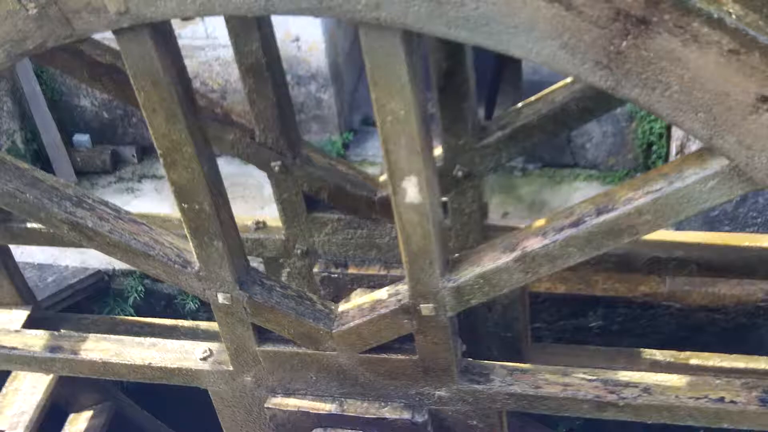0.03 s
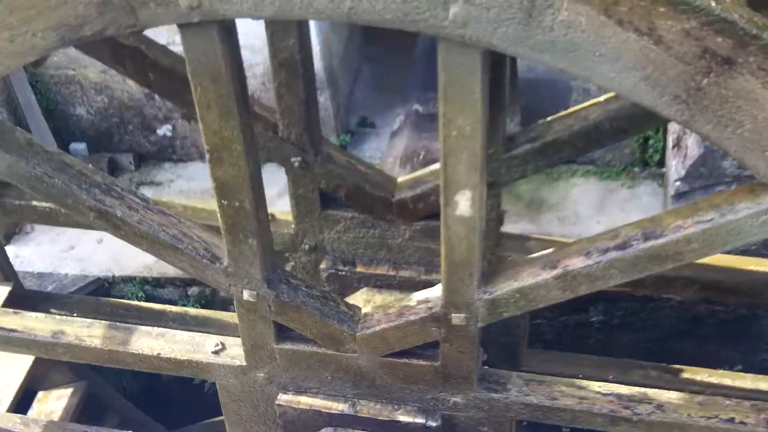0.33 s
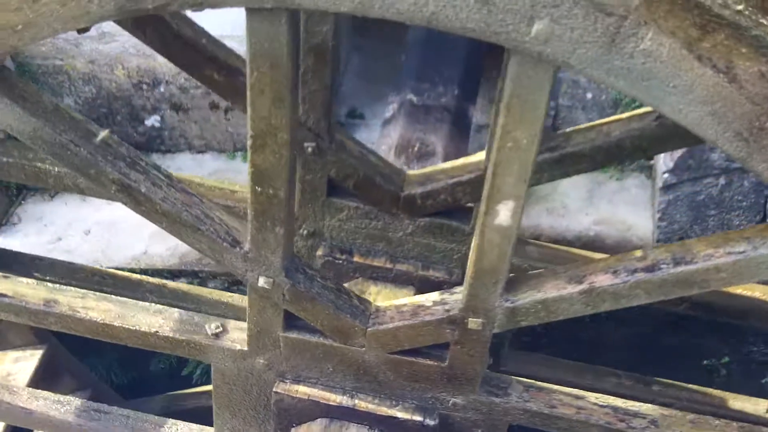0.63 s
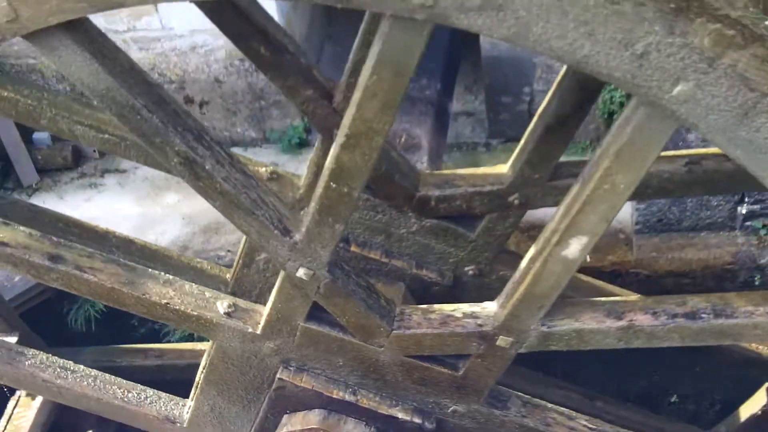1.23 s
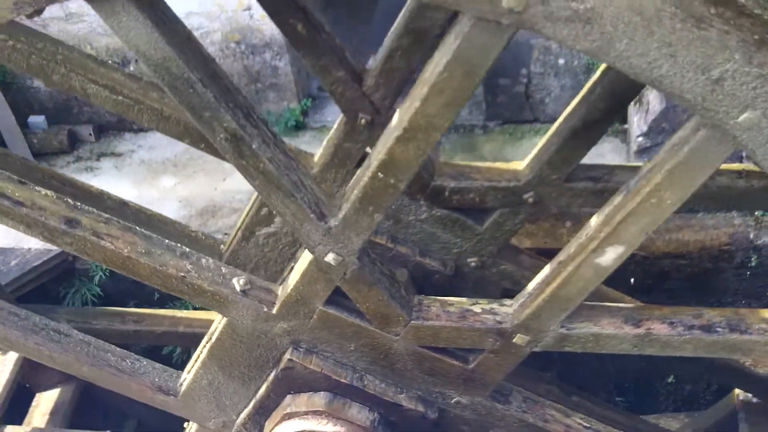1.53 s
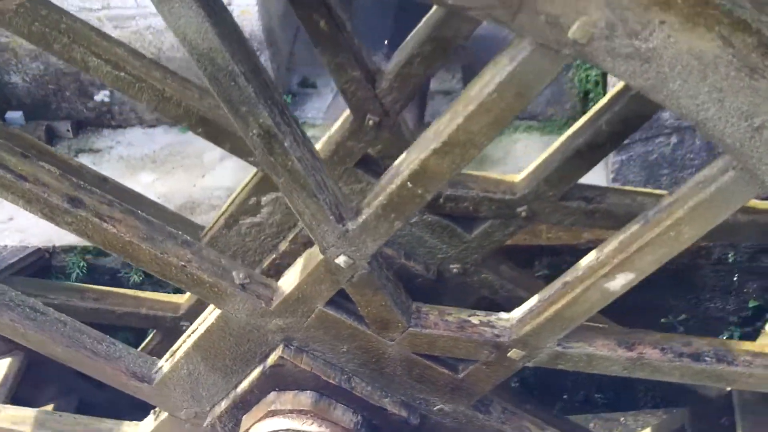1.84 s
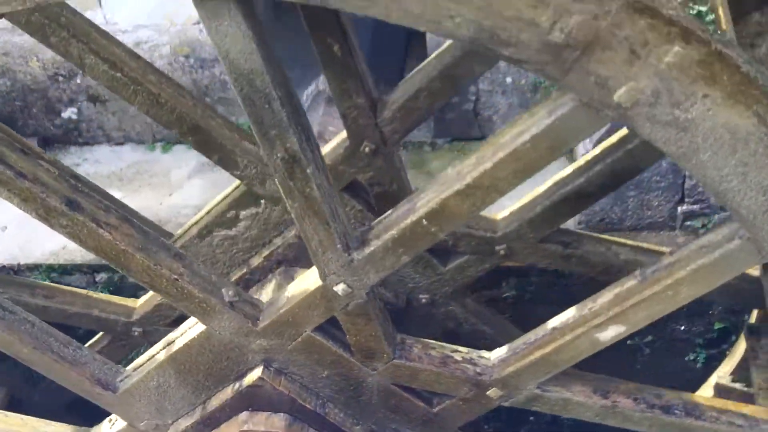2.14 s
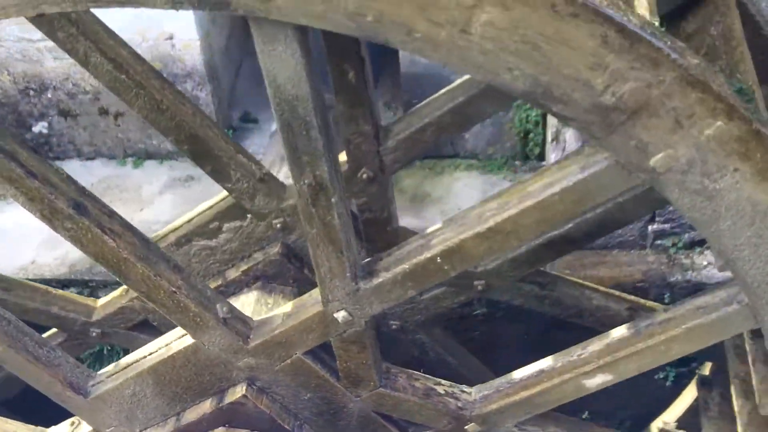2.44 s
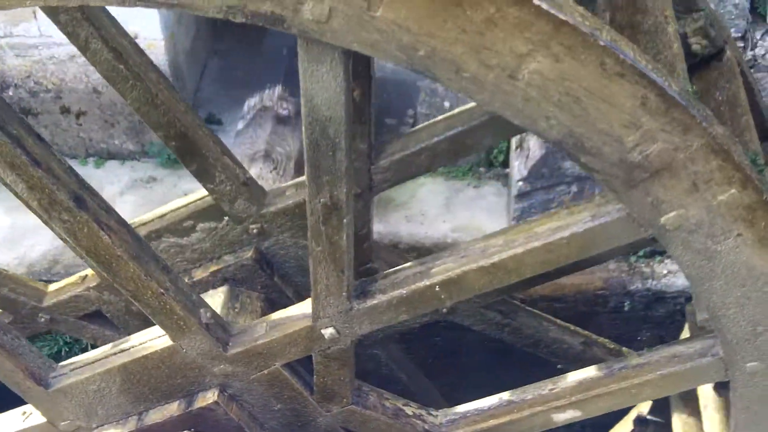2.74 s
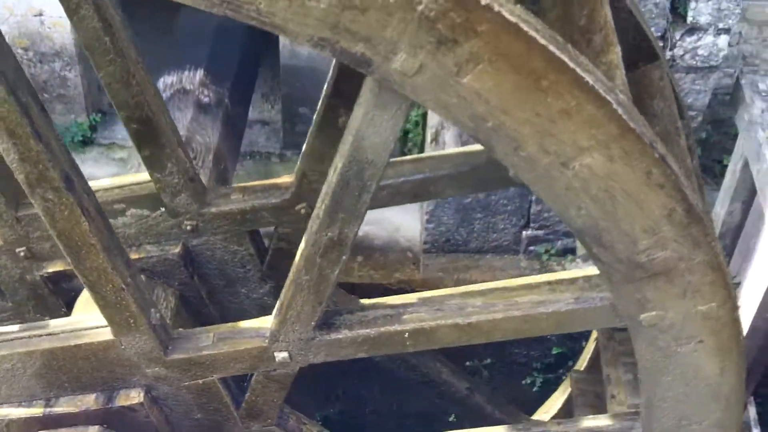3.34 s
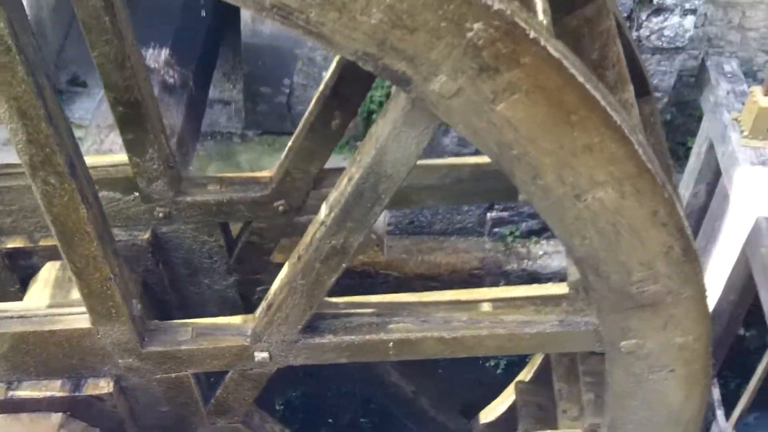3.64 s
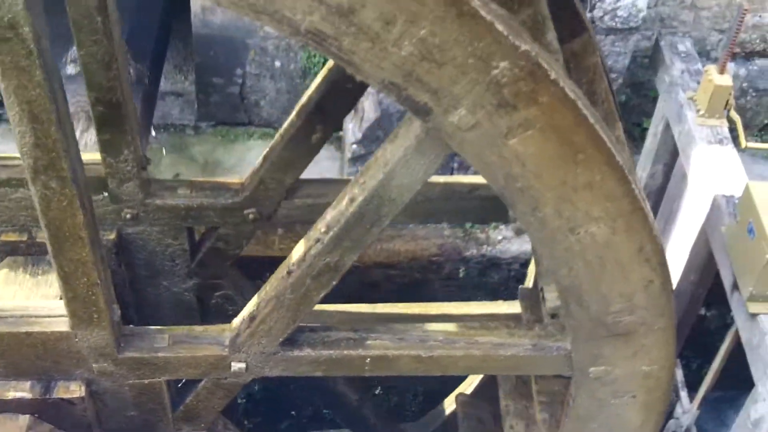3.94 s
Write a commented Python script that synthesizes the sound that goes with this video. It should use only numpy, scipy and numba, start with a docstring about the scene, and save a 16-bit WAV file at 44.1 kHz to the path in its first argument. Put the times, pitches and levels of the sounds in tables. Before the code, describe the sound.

A steady, churning rush of water pours and splashes over a turning wooden water wheel.

```python
"""A steady rush of water cuts in after a moment of silence, pouring over a large wooden wheel
beside a stone wall, a few metres away. The rush is churned foam, thousands of small ringing bubbles
and fine spray. It surges about four times a second as water slaps down, with bright splashes and
darker sloshes. Runoff from the paddles builds near the end; air pockets gulp and the pit thuds below."""
import sys
import numpy as np
from scipy import signal
from scipy.fft import rfft, irfft
from scipy.io import wavfile
from scipy.ndimage import uniform_filter1d
from numba import njit

SR = 44100
rng = np.random.default_rng(int(sys.argv[2]) if len(sys.argv) > 2 else 0)


def to_wav(sig):
    """Store sig (one row per channel, or 1-D mono) as 16-bit WAV at the path in sys.argv[1].

    Samples outside -1..1 are clipped; the rate is SR.
    """
    pcm = np.clip(np.atleast_2d(sig), -1, 1) * 32767
    pcm = np.round(pcm).astype(np.int16)
    wavfile.write(sys.argv[1], SR, pcm.T)  # frames by channels


N = 176400
BUBBLE_GLIDE = 0.069  # fractional pitch rise per decay time


def undb(db):
    """Decibels to gain."""
    return 10 ** (np.asarray(db) / 20)


def level(x, db):
    """Set the rms level."""
    return x * undb(db) / np.sqrt(np.mean(x ** 2))


def colour(x, points):
    """Filter by (f/Hz, gain/dB) points joined on a log-frequency axis."""
    hz, db = np.array(points).T
    bins_hz = np.maximum(np.fft.rfftfreq(N, 1 / SR), 1)
    return irfft(rfft(x) * undb(np.interp(np.log(bins_hz), np.log(hz), db)), N)


def resonate(x, hz, width_hz):
    """Band-pass resonance, applied twice."""
    b, a = signal.iirpeak(hz, hz / width_hz, fs=SR)
    return signal.lfilter(b, a, signal.lfilter(b, a, x))


def noise_band(hz, width_hz, db=0):
    """Band-passed noise at a set rms level."""
    return level(resonate(rng.standard_normal(N), hz, width_hz), db)


def wander(rate_hz):
    """Smooth random drift, rms 1."""
    hold = int(SR / rate_hz)
    steps = rng.standard_normal(1024)[np.arange(N) // hold % 1024]
    return level(uniform_filter1d(uniform_filter1d(steps, hold), hold), 0)


def swell(t, at_s, rise_s, fall_s):
    """Gaussian hump, height 1."""
    return np.exp(-.5 * ((t - at_s) / np.where(t < at_s, rise_s, fall_s)) ** 2)


@njit
def ring(start_samples, hz, q, gain, glide):
    """Each bubble rings as a decaying sine of rising pitch."""
    out = np.zeros(N)
    for k in range(len(start_samples)):
        decay_samples = q[k] * SR / hz[k] / np.pi
        step_rad = 2 * np.pi * hz[k] / SR
        phasor = gain[k] + 0j
        turn = np.exp(1j * step_rad - 1 / decay_samples)
        bend = np.exp(1j * step_rad * glide / decay_samples)
        first = int(start_samples[k])
        for i in range(first, min(N, first + int(5 * decay_samples))):
            out[i] += phasor.imag
            phasor *= turn
            turn *= bend
    return out


# Falling-water spectrum: f/Hz, gain/dB
WATER_SPECTRUM = [(12, -45), (22, -12), (33, -4), (48, -15), (68, -16), (115, -8), (200, -4.5), (310, -3.7),
                  (390, -4.5), (470, -3), (560, -0.9), (1000, -1.2), (1500, -1.4), (2300, -1.5), (2850, -3),
                  (3200, -4.5), (4000, -8.5), (5000, -11.5), (6100, -16), (7000, -23.5)]
def foam(flicker_db=0.65, flicker_hz=22, churn_db=0.34, churn_hz=35):
    """Churned white water: octave bands flicker alone and churn together."""
    octave = np.log2(np.maximum(np.fft.rfftfreq(N, 1 / SR), 1) / 20)
    spectrum = rfft(rng.standard_normal(N))
    wash = np.zeros(N)
    for k in range(10):
        band = irfft(spectrum * np.maximum(1 - abs(octave - k), 0), N)
        wash += band * undb(flicker_db * wander(flicker_hz))
    wash *= undb(churn_db * wander(churn_hz))
    return level(colour(wash, WATER_SPECTRUM), db=-26.5)


def bubbles(per_s=5000, low_hz=430, high_hz=5500, min_q=5.95, spread_db=4):
    """A dense crowd of small bubbles, each ringing for a few milliseconds."""
    when, pitch, length, size = rng.random((int(per_s * N / SR), 4)).T
    hz = (np.sqrt(low_hz) + pitch * (np.sqrt(high_hz) - np.sqrt(low_hz))) ** 2
    gain = undb(spread_db * np.minimum(-np.log(size), 4)) * hz ** 0.74
    crowd = ring(when * N, hz, min_q * 4 ** length, gain, BUBBLE_GLIDE)
    return level(colour(crowd, WATER_SPECTRUM), db=-31)


def spray(per_s=4500, spread_db=3.5):
    """Drops smack on wet planks and on the pool."""
    when, size, polarity = rng.random((int(per_s * N / SR), 3)).T
    gain = np.sign(polarity - .5) * undb(spread_db * np.minimum(-np.log(size), 4))
    ticks = np.bincount((when * N).astype(int), gain, N)
    patter = resonate(ticks, hz=1900, width_hz=5500)
    return level(colour(patter, WATER_SPECTRUM), db=-33)


# Slaps of water: t/s, body lift/dB, treble lift/dB
SURGE_LIFTS = [(.14, 1, 3), (.36, 1.7, 2.4), (.49, 1, 1), (.62, 1.5, 3), (.84, 1, 2), (1.17, 0.3, 2),
               (1.36, 0.8, 1.5), (1.66, -0.5, 1.7), (1.83, 0.5, 2), (1.97, .5, 1), (2.11, 0.2, 1),
               (2.30, 0.1, 1.5), (2.58, 0.4, 2.6), (2.97, 0.8, 0.7), (3.10, .7, 1), (3.27, .6, 2),
               (3.48, 0, 2.5), (3.66, 0.2, 2.6), (3.81, 0.4, 1.9), (3.96, 0.5, 2.5)]
def surges(t, rush, rise_s=0.049, fall_s=0.035, split_hz=3000, ramp_db_per_s=0.24):
    """Each slap of water lifts body and treble separately; the whole rush slowly grows."""
    lifts_db = sum(np.outer([body_db, treble_db], swell(t, at_s, rise_s, fall_s))
                   for at_s, body_db, treble_db in SURGE_LIFTS)
    lifts_db -= lifts_db.mean(axis=1, keepdims=True)
    body_gain, treble_gain = undb(lifts_db + ramp_db_per_s * (t - t.mean()))
    body = signal.sosfiltfilt(signal.butter(3, split_hz, fs=SR, output="sos"), rush)
    return body_gain * body + treble_gain * (rush - body)


# Bright splashes: t/s, f/Hz, level/dB
SPLASH_CLUSTERS = [(.61, 2460, -31), (1.66, 2730, -35), (1.84, 2330, -34), (2.0, 2000, -34),
                   (2.32, 2150, -36), (2.57, 2370, -31), (2.81, 2340, -31), (3.09, 1920, -30.5),
                   (3.2, 2370, -32.5), (3.8, 2450, -33.5)]
def splashes(t, count=50, q=26, spread_oct=0.134, spread_s=.021):
    """Each splash traps a cluster of small bubbles that ring around one pitch."""
    out = np.zeros(N)
    for at_s, centre_hz, db in SPLASH_CLUSTERS:
        when, pitch = rng.standard_normal((count, 2)).T
        starts_s = np.maximum(at_s + spread_s * when, 0)
        hz = centre_hz * 2 ** (spread_oct * pitch)
        cluster = ring(starts_s * SR, hz, q * np.ones(count), np.ones(count), BUBBLE_GLIDE)
        duty = np.mean(swell(t, at_s, spread_s, spread_s))
        out += level(cluster, db) * np.sqrt(duty)  # rms over the splash itself
    return out


# Plunging slugs: t/s, f/Hz, level/dB
SLOSH_PLUNGES = [(.17, 530, -35), (.36, 387, -38), (.55, 780, -35.5), (.62, 603, -36), (.81, 600, -40),
                 (1.0, 420, -38), (1.22, 740, -36), (1.53, 700, -38), (2.05, 640, -33), (2.27, 647, -34),
                 (2.46, 563, -35), (2.74, 540, -31), (2.96, 704, -39), (3.09, 1100, -31),
                 (3.42, 700, -36.5), (3.84, 800, -32), (3.96, 420, -36.5)]
def sloshes(t, q=1.14, sigma_s=0.031):
    """Heavier slugs of water plunge with a darker splash, each at its own pitch."""
    return sum(noise_band(hz, hz / q, db) * swell(t, at_s, sigma_s, sigma_s)
               for at_s, hz, db in SLOSH_PLUNGES)


# Runoff envelope: t/s, level/dB
RUNOFF_ENVELOPE = [(0, -56), (2.3, -49), (3.2, -36.5), (3.6, -32), (4, -34.5)]
def runoff(t):
    """Water running off the paddles thickens the midrange as the wheel comes round."""
    times_s, levels_db = np.array(RUNOFF_ENVELOPE).T
    return noise_band(hz=1600, width_hz=2100) * undb(np.interp(t, times_s, levels_db))


def gurgles(per_s=30, low_hz=520, high_hz=1500, q=39.5, glide=0.0495, spread_db=6):
    """Scattered larger bubbles blip upward through the wash."""
    when, pitch, size = rng.random((int(per_s * N / SR), 3)).T
    hz = low_hz * (high_hz / low_hz) ** pitch
    blips = ring(when * N, hz, np.full(len(hz), q), undb(spread_db * size), glide)
    return level(blips, db=-42)


# Air-pocket resonances: f/Hz, width/Hz, level/dB
POCKET_MODES = [(123.4, 33, -53), (174.9, 12, -52), (207, 22, -52.5)]
# Gulps of trapped air: t/s, f/Hz, level/dB, sigma/s
POCKET_GULPS = [(.22, 174, -48, .04), (.35, 124.5, -45.5, 0.052), (0.584, 122, -43, 0.039),
                (.62, 211, -42, 0.04), (.71, 194.4, -41.5, .03), (0.787, 182, -36, 0.0258),
                (0.925, 211, -32.5, 0.018), (1.363, 124, -43, .035), (2.135, 168, -46, 0.027),
                (2.267, 130, -44, 0.027), (2.306, 206, -42, .022), (2.365, 117, -47, 0.027),
                (2.80, 205, -43, 0.029), (2.917, 121.2, -41, 0.028), (3.352, 203, -38.5, 0.06),
                (3.457, 168.5, -40, 0.03)]
def air_pockets(t, waver=0.042, waver_hz=70, sag_per_s=.7):
    """Hollows murmur under the rush and gulp at a wavering, sagging pitch."""
    out = sum(noise_band(hz, width_hz, db) for hz, width_hz, db in POCKET_MODES)
    for at_s, hz, db, sigma_s in POCKET_GULPS:
        sag = sag_per_s * np.clip(t - at_s, -2 * sigma_s, 2 * sigma_s)
        pitch_hz = hz * (1 + waver * wander(waver_hz) - sag)
        phase = 2 * np.pi * np.cumsum(pitch_hz) / SR
        out += level(np.sin(phase), db) * swell(t, at_s, sigma_s, sigma_s)
    return out


# Landings in the pit: t/s, level/dB
PIT_THUDS = [(.32, -47.5), (1.58, -50.5), (1.82, -44), (2.08, -47), (2.27, -50), (3.29, -51)]
def thuds(t, sigma_s=0.046):
    """The weight of the falling water thuds faintly in the pit."""
    envelope = sum(undb(db) * swell(t, at_s, sigma_s, sigma_s) for at_s, db in PIT_THUDS)
    return noise_band(hz=34, width_hz=29) * envelope


def wall_echo(x, t60_s=0.3, delay_s=.008, echo_db=-7):
    """Direct sound plus a short scattered echo from the stone wall and wheel pit."""
    t = np.arange(SR // 2) / SR
    tail = rng.standard_normal(len(t)) * np.exp(-np.log(1000) * t / t60_s) * (t > delay_s)
    return x + undb(echo_db) * signal.fftconvolve(x, tail / np.linalg.norm(tail))[:N]


# Hiss spectrum: f/Hz, gain/dB
HISS_SPECTRUM = [(8300, -5.5), (8800, 4.5), (9350, -5.5), (9900, 3), (10600, 0.5), (11500, -3.5),
                 (13500, -6)]
def hiss(edge_hz=8200):
    """Faint steady hiss above the microphone's treble edge."""
    highpass = signal.ellip(8, .2, 70, edge_hz, "high", fs=SR, output="sos")
    noise = colour(rng.standard_normal(N), HISS_SPECTRUM)
    return level(signal.sosfilt(highpass, noise), db=-58.5)


def scene():
    """Surging rush, splashes and runoff over sloshes, air pockets and thuds; mono."""
    t = np.arange(N) / SR
    rush = surges(t, foam() + wall_echo(bubbles() + spray()))
    splashing = wall_echo(splashes(t) + gurgles())
    return (rush + splashing + runoff(t) + sloshes(t) + air_pockets(t) + thuds(t))[None]


def record(dry, treble_edge_hz=7100, start_s=.105, top_hz=13700):
    """The microphone loses the treble steeply; water and hiss cut in together after silence."""
    treble_cut = signal.ellip(10, .2, 70, treble_edge_hz, fs=SR, output="sos")
    top_cut = signal.ellip(10, .2, 90, top_hz, fs=SR, output="sos")
    dull = signal.sosfilt(treble_cut, dry)
    gate = np.arange(N) / SR > start_s
    return signal.sosfilt(top_cut, (dull + hiss()) * gate)


dry = scene()
out = record(dry)
to_wav(out)
```